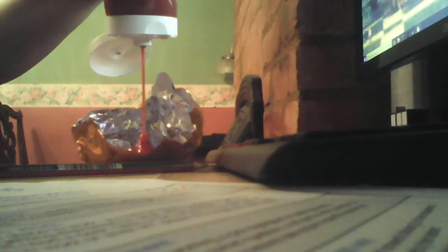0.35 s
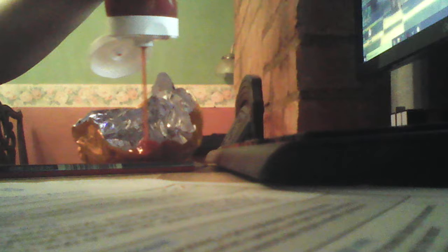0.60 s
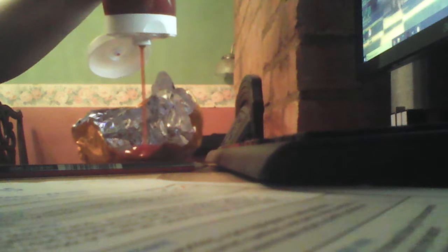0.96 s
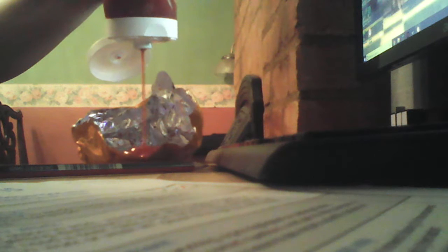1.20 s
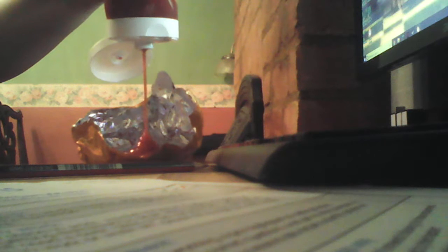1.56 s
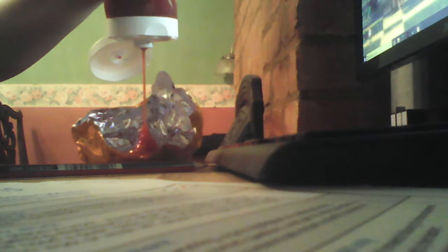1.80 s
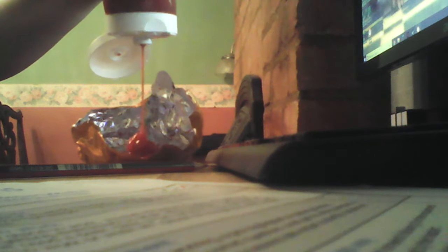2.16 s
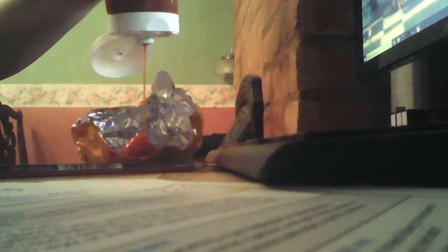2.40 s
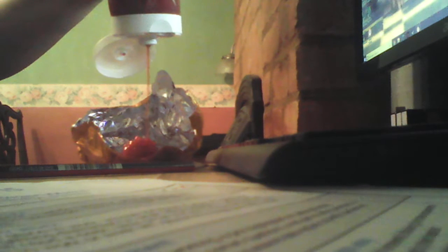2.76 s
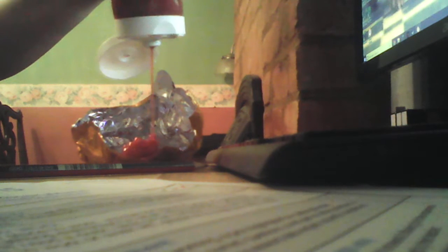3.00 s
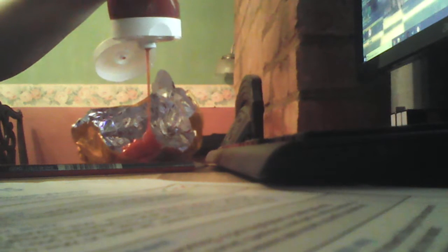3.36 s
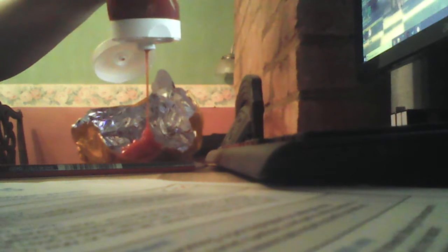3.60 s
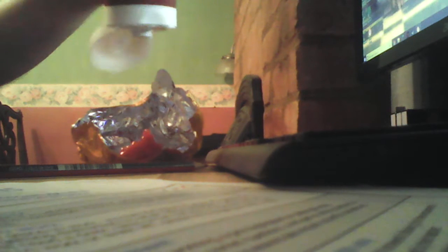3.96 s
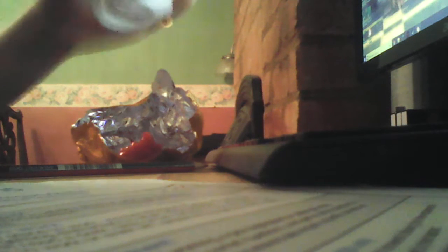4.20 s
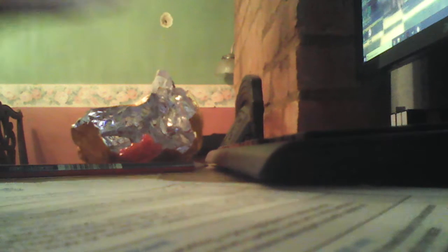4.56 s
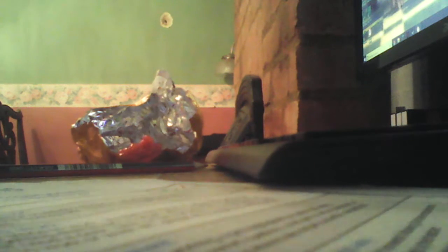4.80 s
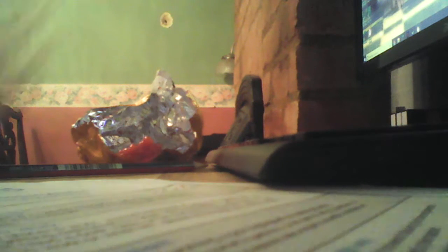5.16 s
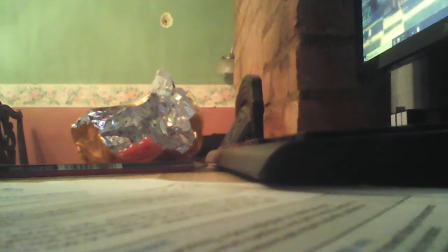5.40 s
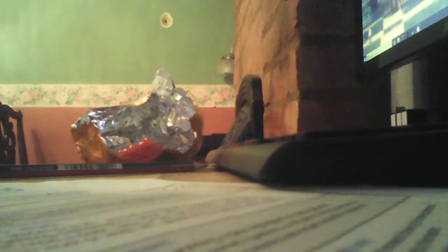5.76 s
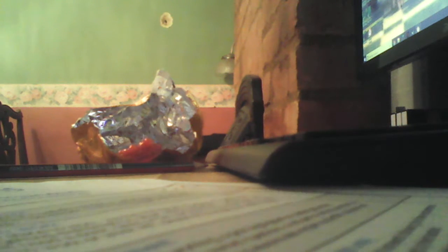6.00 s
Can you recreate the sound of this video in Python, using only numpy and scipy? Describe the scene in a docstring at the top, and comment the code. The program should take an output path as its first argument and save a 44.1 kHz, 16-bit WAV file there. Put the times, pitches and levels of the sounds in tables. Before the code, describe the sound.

A squeezed sauce bottle ticks and pops wetly, then a lid click, a knock on the desk and small clatters over a faint hum.

```python
"""Sauce is squeezed from a plastic bottle onto a foil-wrapped snack, close to a stereo microphone.
Tiny bubbles tick in the nozzle, air pockets pop and splutter, and the bottle gulps air back in.
The flip cap snaps shut, the bottle lands on the desk with a low ring, and things are bumped, tapped
and slid about. Hits are impulses coloured by the struck body, or dying sines; slides and gulps are
swells of noise. All of it sits in a small live room with a faint mains hum."""
import sys
import numpy as np
from scipy import signal
from scipy.fft import rfft, irfft
from scipy.io import wavfile
from scipy.ndimage import uniform_filter1d

SR = 44100
rng = np.random.default_rng(int(sys.argv[2]) if len(sys.argv) > 2 else 0)


def output_pcm(signal):
    """Save a mono or channel-first signal as 16-bit PCM at the path in sys.argv[1].

    Samples are clipped to [-1, 1] before scaling.
    """
    pcm = np.clip(np.atleast_2d(signal).T, -1, 1) * 32767
    wavfile.write(sys.argv[1], SR, np.round(pcm).astype(np.int16))


N = 268128
HIT_SAMPLES = 4096
HIT_TIME, CLOCK = np.arange(HIT_SAMPLES) / SR, np.arange(N) / SR

# air pockets blown through the nozzle: start_s, pitch_hz, pop_db, spatter_db, cap_db
POPS = [(1.2015, 774, -24.5, -29.5, -33.5), (1.2224, 783, -24.5, -34, -34.5),
        (1.2446, 790, -25.5, -32, -35.5), (1.286, 850, -33.5, -34, -45.5), (1.3426, 520, -38, -41.5, -47)]
# tiny bubbles bursting: start_s, pitch_hz, ring_db, cap_db, fizz_db
SPITS = [(0.4188, 5600, -57.5, -67.5, -95), (0.9716, 6050, -47.5, -67, -66), (1.029, 5580, -47.5, -72, -82),
         (1.1377, 6300, -61, -71, -63.5), (1.5204, 5600, -51, -57.5, -44.5),
         (1.5664, 5600, -64, -61.5, -56.5), (1.609, 5600, -65, -73.5, -87), (1.6314, 5600, -61, -75, -90),
         (1.665, 5610, -52, -65.5, -94), (2.9075, 5480, -60.5, -49, -83), (2.9387, 5780, -57.5, -58.5, -86)]
# air drawn back in: peak_s, swell_s, gurgle_db, hiss_db
GULPS = [(4.013, 0.014, -52, -65), (4.044, 0.0059, -44, -47)]
# contacts of the closing lid and of the bottle's base: start_s, level_db
SNAP_HITS = [(4.5599, -29.5), (4.5607, -21), (4.5627, -29.5)]
LANDING_HITS = [(4.856, -24), (4.8578, -21), (4.8675, -30)]
# soft, heavy bumps on the desk: start_s, pitch_hz, thump_db, wood_db
BUMPS = [(2.77, 221.9, -61.5, -82), (3.949, 355, -59.5, -55), (4.419, 124.8, -65.5, -64),
         (5.481, 353, -41, -30), (5.52, 240, -27.5, -28.5), (5.6242, 276, -40.5, -36),
         (5.709, 136.4, -30.5, -37), (5.754, 227.5, -29, -39), (5.818, 377, -38, -26),
         (5.833, 405, -35.5, -24), (5.939, 252, -29.5, -39), (6.004, 271, -39.5, -36.5)]
# hard contacts between small things: start_s, clack_db, click_db, edge_db
TAPS = [(5.133, -88, -65, -68.5), (5.277, -64, -75.5, -82), (5.445, -57.5, -63.5, -83),
        (5.5109, -46, -55, -50.5), (5.5194, -41, -45.5, -48.5), (5.611, -54.5, -59, -79),
        (5.624, -39.5, -40, -79), (5.709, -76, -62, -77), (5.755, -71, -62, -79), (5.818, -41, -49.5, -52),
        (5.832, -51, -47, -55), (5.94, -54.5, -65, -79), (6.003, -48, -70, -78), (6.0136, -32, -44.5, -54)]
# small hard things left ringing: start_s, pitch_hz, level_db, t60_s
CLINKS = [(5.484, 950, -40.5, 0.19), (5.623, 2284, -34.5, 0.13), (5.817, 2315, -39, 0.012),
          (5.829, 654, -31.5, 0.13), (5.9193, 1530, -45, 0.023), (6.0149, 4420, -49.5, 0.046)]
# pushes along the desk: start_s, level_db
SLIDES = [(3.971, -63.5), (4.389, -72.5), (4.97, -66.5), (5.11, -67), (5.229, -70), (5.551, -55),
          (5.81, -61.5), (6.01, -63)]

# modes of the cap and of the bottle on the desk: pitch_hz, relative_db, t60_s
CAP_MODES = [(2513, -2.5, 0.016), (1670, -4.5, 0.014), (3450, -5, .015), (4367, -7.5, 0.015)]
BOTTLE_MODES = [(132, -21, 0.39), (438, -1, 0.074), (486.5, 5.5, 0.069), (462, -17, 0.65),
                (1190, -7.5, 0.038), (1237, -6.5, .05), (1454, -6.5, 0.12), (2013, -5, 0.015)]
# tunable resonances: pitch_ratio, relative_db
POP_SHAPE = [(.06, -42.5), (.2, -33), (.4, -26.5), (.58, -10), (.78, -1.5), (1, 2.5), (1.2, 0), (1.45, -4),
             (1.75, -19.5), (2.3, -12.5), (3, -24.5), (9, -50.5)]  # hollow air pocket
TICK_SHAPE = [(.1, -47.5), (.66, -36.5), (.8, -12), (.9, -2.5), (1, 7), (1.1, -5.5), (1.24, -11.5),
              (1.4, -41.5), (2.6, -58.5)]  # tiny bubble
CLINK_SHAPE = [(.3, -51), (.82, -23), (.92, 2), (1, 9), (1.08, -8), (1.2, -16), (2.5, -64)]  # cluster of close modes
# tone colours: frequency_hz, relative_db
SPATTER_COLOUR = [(40, -41.5), (200, -24), (1000, -4.5), (1700, 8), (2100, 0), (2500, 1), (2900, 4.5),
                  (4300, -2.5), (5600, 4), (7200, -5.5), (8500, -15.5), (12000, -25), (15000, -47)]  # tearing sauce film
FIZZ_COLOUR = [(500, -9), (2000, -6.5), (6000, 12.5), (9500, 2.5), (15000, -22)]  # fine spray
CAP_COLOUR = [(300, -33), (1500, -24.5), (2100, -20.5), (2430, 7.5), (2830, -14), (3250, 5.5), (3750, -16),
              (6000, -33), (12000, -51)]  # shaken cap
GURGLE_COLOUR = [(300, -36), (650, -20), (790, -2.5), (930, -20), (1110, 1), (1350, -39.5), (2200, -41),
                 (2500, -3.5), (2900, -39), (8000, -48)]  # wet nozzle
SNAP_COLOUR = [(40, -57.5), (150, -26), (300, -39), (470, -4.5), (620, -13.5), (1200, -13), (2300, -4),
               (2850, -15), (3400, -8), (4400, -8), (5600, -20), (7000, -19), (8500, -36), (15000, -49)]  # lid's peg
LANDING_COLOUR = [(30, -48), (70, -29.5), (125, -6), (200, -12.5), (450, 2.5), (650, -5), (1000, -1),
                  (1500, 5), (2100, -2.5), (2600, -9.5), (3300, 0), (4600, -13.5), (5700, -13), (8500, -31),
                  (15000, -42)]  # bottle's base on the desk
WOOD_COLOUR = [(40, -43.5), (80, -13), (130, 2.5), (280, 2.5), (400, 6.5), (520, -1), (620, -24), (740, -2),
               (1100, -32), (3000, -63)]  # desk top
CLACK_COLOUR = [(200, -15.5), (600, 1.5), (900, 3.5), (1500, 0), (2000, -10.5), (5000, -75)]  # a tap's midrange body
CLICK_COLOUR = [(60, -43), (500, -21), (1800, -14), (2250, 8), (2900, 0.5), (3600, 2), (4600, -9),
                (7000, -15), (8500, -40), (11000, -57), (15000, -57)]  # a tap's bite
EDGE_COLOUR = [(500, -27), (3000, -6), (6000, 11.5), (8000, 1), (10500, -10), (15000, -28)]  # a hard edge's bright tick
SLIDE_COLOUR = [(60, -1), (230, -6), (500, -6.5), (900, -11.5), (2300, -12.5), (6000, -16.5), (9000, -47.5),
                (15000, -56)]  # rubbing on the desk
AIR_COLOUR = [(20, -1), (45, -5), (90, 3), (140, -0.5), (220, 2), (300, -7.5), (500, -9), (750, -11.5),
              (1000, -14), (2500, -19), (6000, -22.5), (8000, -31.5), (15000, -33)]  # room tone
CLUTTER_COLOUR = [(100, -18), (500, -9.5), (1500, 2.5), (15000, -2.5)]  # thin echoes off small objects

# mains hum and a computer fan: pitch_hz, right_db, left_minus_right_db
HUM_LINES = [(119.7, -59, -29.5), (321.6, -76, -15), (365, -79.5, -10), (735, -85.5, -4.5)]
# the room's decay: frequency_hz, t60_s
ROOM_DECAY = [(120, 0.47), (300, 0.45), (600, 0.34), (2500, 0.38), (5000, 0.25), (9000, 0.3), (15000, 0.24)]
# how alike the two microphones hear diffuse sound: frequency_hz, coherence
MIC_COHERENCE = [(30, 1), (100, -0.5), (250, 0.47), (600, 0.31), (1300, -0.04), (3000, -0.01), (15000, 0)]
# the microphones' stereo lean: frequency_hz, left_minus_right_db
MIC_BALANCE = [(100, -7), (250, 1.5), (480, -8), (900, -2), (2200, -1.5), (4000, 0.5), (6000, 4.5),
               (10000, -3)]


def splutter():
    """An air pocket pops hollowly; the sauce film behind it tears just after and rattles the cap."""
    out = np.zeros((2, N))
    tone_offset_db, first_tear_offset_db, tear_delay_s = -3, -8, .0024
    for s, hz, pop_db, spatter_db, cap_db in POPS:
        add(out, s, ring([(hz, 0, .032)], pop_db + tone_offset_db, rise_s=.0009))
        add(out, s, crack(pitched(POP_SHAPE, hz), pop_db, decay_s=.004, scatter=2.4))
        add(out, s, crack(SPATTER_COLOUR, spatter_db + first_tear_offset_db, decay_s=.0047, scatter=1.9))
        add(out, s + tear_delay_s, crack(SPATTER_COLOUR, spatter_db, decay_s=.0023, scatter=1.7))
        add(out, s + tear_delay_s, ring(CAP_MODES, cap_db, rise_s=.0014))
    return out


def spits():
    """Each tiny bubble rings high in the nozzle, shakes the cap and sprays a little."""
    out = np.zeros((2, N))
    for s, hz, ring_db, cap_db, fizz_db in SPITS:
        add(out, s, crack(pitched(TICK_SHAPE, hz), ring_db, decay_s=.0006, scatter=.49))
        add(out, s, crack(CAP_COLOUR, cap_db, decay_s=.00028, scatter=.89))
        add(out, s, crack(FIZZ_COLOUR, fizz_db, decay_s=.0036, scatter=5.1))
    return pan(left_minus_right_db=-.5) * out


def gulps():
    """As the grip eases, the bottle sucks air back in gulps that gurgle and hiss."""
    gurgle, hiss = diffuse(N, GURGLE_COLOUR), diffuse(N, SPATTER_COLOUR)
    out = np.zeros((2, N))
    fade_s = .014
    for peak_s, swell_s, gurgle_db, hiss_db in GULPS:
        age = CLOCK - peak_s
        flow = np.exp(-(np.minimum(age, 0) / swell_s) ** 2 - np.maximum(age, 0) / fade_s)
        out += flow * (amp(gurgle_db) * gurgle + amp(hiss_db) * hiss)
    return out


def cap_snap():
    """The lid's peg touches, snaps home and rebounds."""
    out = np.zeros((2, N))
    for s, db in SNAP_HITS:
        add(out, s, crack(SNAP_COLOUR, db, decay_s=.0007, scatter=.9))
    return out


def bottle_landing():
    """The bottle's base strikes the desk and rocks once; bottle and desk ring low."""
    out = np.zeros((2, N))
    for s, db in LANDING_HITS:
        add(out, s, crack(LANDING_COLOUR, db, decay_s=.0028, scatter=3.4))
    add(out, LANDING_HITS[0][0], ring(BOTTLE_MODES, db=-22, rise_s=.0016))
    return out


def bumps():
    """A soft push thumps the desk and stirs its wooden top."""
    out = np.zeros((2, N))
    for s, hz, thump_db, wood_db in BUMPS:
        add(out, s, ring([(hz, 0, .06)], thump_db, rise_s=.0073))
        add(out, s, crack(WOOD_COLOUR, wood_db, decay_s=.026, scatter=1.7))
    return out


def taps():
    """Hard contacts clack, click and tick, and small things ring on."""
    out = np.zeros((2, N))
    for s, clack_db, click_db, edge_db in TAPS:
        add(out, s, crack(CLACK_COLOUR, clack_db, decay_s=.013, scatter=2.04))
        add(out, s, crack(CLICK_COLOUR, click_db, decay_s=.0073, scatter=1.4))
        add(out, s, crack(EDGE_COLOUR, edge_db, decay_s=.004, scatter=2.6))
    attack = 1 - np.exp(-HIT_TIME / .00069)
    for s, hz, db, t60 in CLINKS:
        decay = amp(-60 * HIT_TIME / t60) * (1 - HIT_TIME / HIT_TIME[-1])
        ringing = diffuse(HIT_SAMPLES, pitched(CLINK_SHAPE, hz))
        add(out, s, at_level(ringing * attack * decay, db))
    return out


def slides():
    """A hand pushes things along the desk with an uneven grip: each rub swells fast, then fades."""
    attack_s, fade_db_per_s, uneven_db = .032, 58.5, 3.7
    power = np.zeros(N)
    for s, db in SLIDES:
        age = np.maximum(CLOCK - s, 0)
        fade_db = fade_db_per_s * np.maximum(age - attack_s, 0)
        power += (np.minimum(age / attack_s, 1) * amp(db - fade_db)) ** 2
    grip = uniform_filter1d(rng.standard_normal(N), 600)
    return diffuse(N, SLIDE_COLOUR) * np.sqrt(power) * amp(uneven_db * grip / grip.std())


def room_tone():
    """A bed of room air under wavering mains and fan hum that leans to the right."""
    out = amp(-69) * diffuse(N, AIR_COLOUR)
    for hz, db, left_offset_db in HUM_LINES:
        drift = np.interp(CLOCK, np.linspace(0, CLOCK[-1], 30), rng.standard_normal(30))
        waver = .13 * drift * hz / HUM_LINES[0][0]
        hum = np.sqrt(2) * np.sin(2 * np.pi * hz * CLOCK + waver)
        out += amp([[db + left_offset_db], [db]]) * hum
    return out


def room(x, near_db, tail_db):
    """Direct sound, quick echoes off the desk clutter, and a tail that lasts longest in the bass."""
    size = SR * 6 // 10
    t = np.arange(size) / SR
    near = diffuse(size, CLUTTER_COLOUR) * np.exp(-t / .0089) * (t > .0014)
    hz, when, bands = signal.stft(diffuse(size), SR, nperseg=256)
    decay = amp(-60 * when / curve_at(ROOM_DECAY, hz)[:, None])
    tail = signal.istft(bands * decay, SR, nperseg=256)[1][:, :size]
    tail *= np.clip((t - .004) / .0086, 0, 1)  # pre-delay and build-up
    echoes = amp(near_db) * near / np.linalg.norm(near[0])
    echoes += amp(tail_db) * tail / np.linalg.norm(tail[0])
    return x + signal.fftconvolve(x, echoes, axes=1)[:, :N]


def crack(colour, db, decay_s, scatter):
    """A sharp impulse and a dying scatter of smaller ones, through a body's colour."""
    force = diffuse(HIT_SAMPLES) * np.exp(-HIT_TIME / decay_s)
    force *= scatter / np.linalg.norm(force[0])
    force[:, 0] += 1
    spectrum = np.fft.fft(force)
    hz = abs(np.fft.fftfreq(HIT_SAMPLES, 1 / SR))
    # the scatter smears the hit in time but leaves only shallow notches
    gain = amp(curve_at(colour, hz)) / np.sqrt(abs(spectrum) + .05)
    body = np.exp(np.conj(signal.hilbert(np.log(gain))))  # minimum phase keeps the attack crisp
    hit = np.fft.ifft(body * spectrum).real
    return at_level(hit * (1 - HIT_TIME / HIT_TIME[-1]) ** 2, db)


def ring(modes, db, rise_s):
    """Dying sines (pitch_hz, relative_db, t60_s), set going by a push that softens the attack."""
    t = HIT_TIME
    tone = sum(amp(level - 60 * t / t60) * np.sin(2 * np.pi * hz * t) for hz, level, t60 in modes)
    attack = 1 - np.exp(-(t / rise_s) ** 2)
    fade_out = np.minimum(1, 2 * (1 - t / t[-1]))
    return at_level(tone * attack * fade_out, db)


def diffuse(size, colour=((1, 0), (2, 0))):
    """Coloured stereo noise of rms 1, white by default, centred in the deep bass and wide on top."""
    hz = np.fft.rfftfreq(size, 1 / SR)
    left, unrelated = np.exp(2j * np.pi * rng.random((2, len(hz))))
    coherence = np.clip(curve_at(MIC_COHERENCE, hz), -1, 1)
    right = coherence * left + np.sqrt(1 - coherence ** 2) * unrelated
    noise = irfft(np.array([left, right]) * amp(curve_at(colour, hz)), size)
    return noise / noise.std()


def pitched(shape, hz):
    """A resonance shape tuned to a pitch."""
    return [(hz * ratio, db) for ratio, db in shape]


def curve_at(points, hz):
    """A table's value on a log-frequency axis."""
    frequencies, values = np.transpose(points)
    return np.interp(np.log(hz + 1), np.log(frequencies + 1), values)


def amp(db):
    """Decibels to gain."""
    return 10 ** (np.asarray(db) / 20)


def at_level(hit, db):
    """Gives a hit the energy of 10 ms at this level."""
    energy = np.mean(np.sum(hit ** 2, -1)) / SR
    return amp(db) * hit / np.sqrt(energy / .01)


def pan(left_minus_right_db):
    """Left and right gains for a level difference."""
    return amp(np.array([[.5], [-.5]]) * left_minus_right_db)


def from_left(x, lag_samples):
    """Sound from the left reaches the right microphone later."""
    return np.array([x[0], np.roll(x[1], lag_samples)])


def add(mix, start_s, sound):
    """Drops a sound into the mix at its cue."""
    part = mix[:, round(start_s * SR):][:, :sound.shape[-1]]
    part += sound[..., :part.shape[1]]


def scene():
    """The squeeze in front, the cap and desk work off to the left, all in one room."""
    mix = room(spits(), near_db=-10, tail_db=-13.5)
    mix += room(splutter() + gulps(), near_db=-10.5, tail_db=-13)
    mix += room(from_left(cap_snap(), lag_samples=3), near_db=-11.5, tail_db=-5.5)
    mix += room(from_left(bottle_landing(), lag_samples=4), near_db=-20, tail_db=-6.5)
    mix += room(from_left(bumps(), lag_samples=7), near_db=-12, tail_db=-11)
    mix += room(from_left(taps(), lag_samples=10), near_db=-6, tail_db=-8)
    mix += slides()
    # the right microphone hears more of the bass and low mids
    balance = pan(curve_at(MIC_BALANCE, np.fft.rfftfreq(N, 1 / SR)))
    return irfft(rfft(mix) * balance, N) + room_tone()


def record(dry):
    """A steep low-pass trims the very top."""
    cutoff_hz = 15350
    lowpass = signal.firwin(301, cutoff_hz, window=("kaiser", 9), fs=SR)
    return signal.oaconvolve(dry, lowpass[None], "same", axes=1)


dry = scene()
out = record(dry)
output_pcm(out)
```